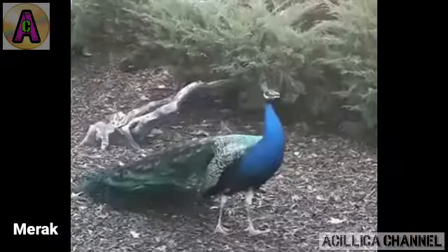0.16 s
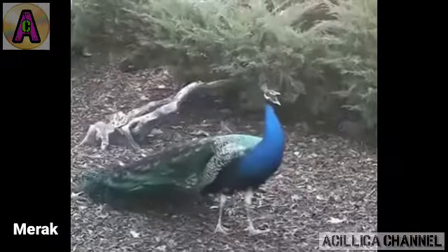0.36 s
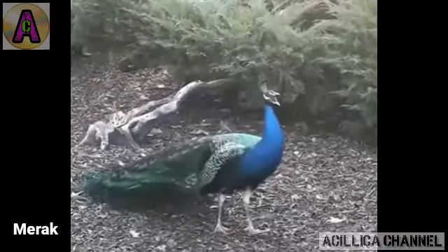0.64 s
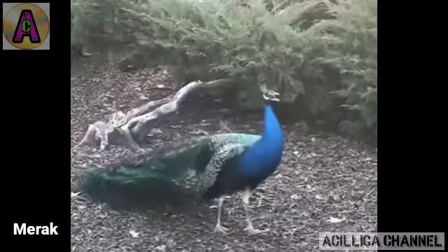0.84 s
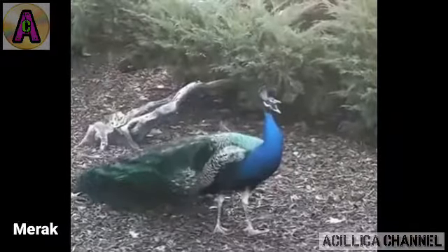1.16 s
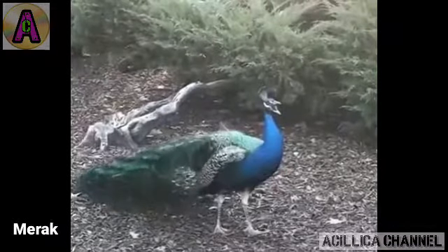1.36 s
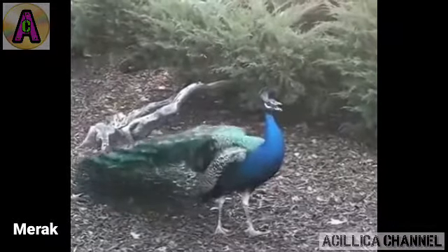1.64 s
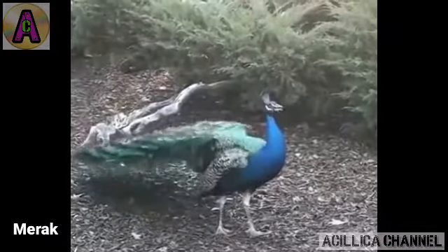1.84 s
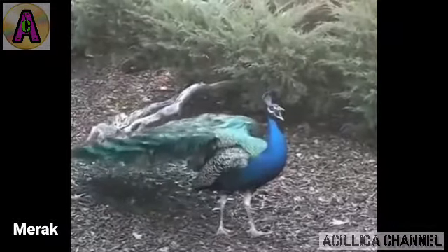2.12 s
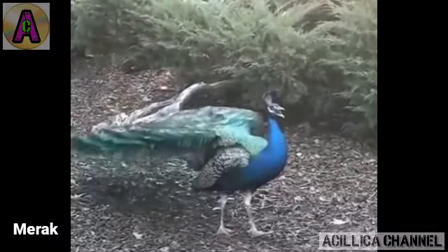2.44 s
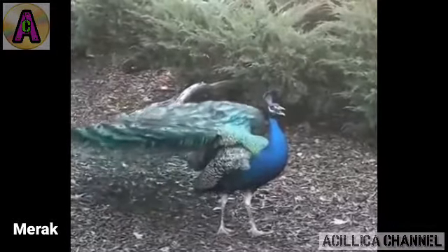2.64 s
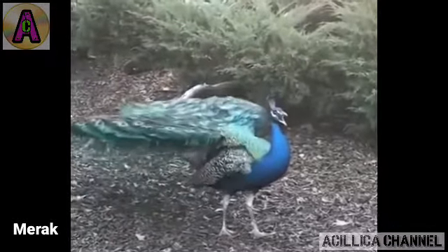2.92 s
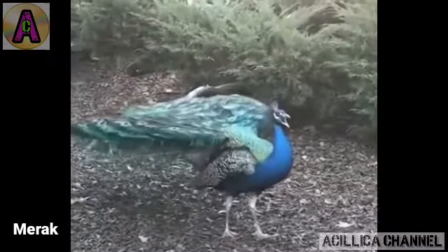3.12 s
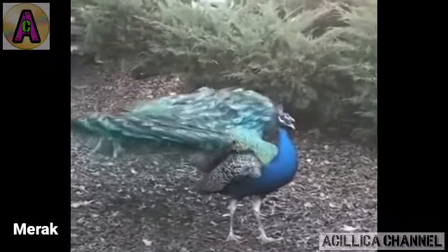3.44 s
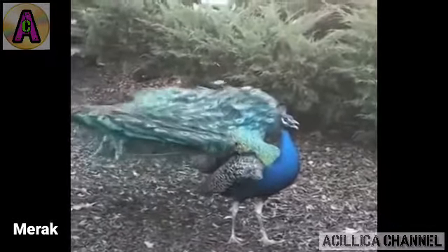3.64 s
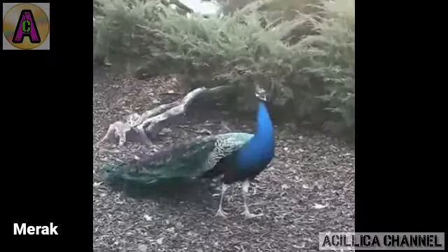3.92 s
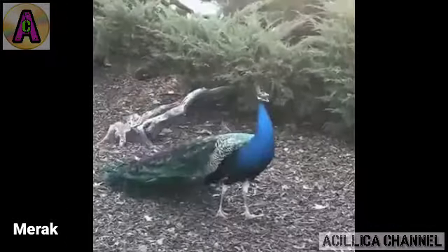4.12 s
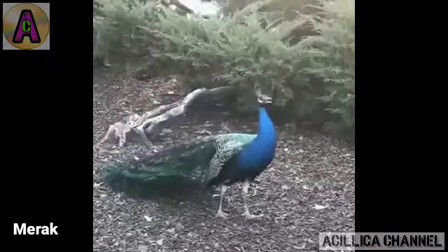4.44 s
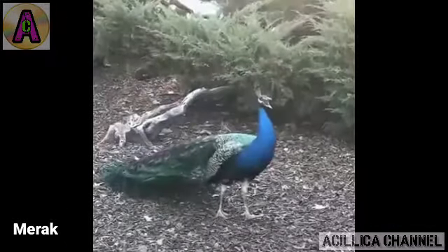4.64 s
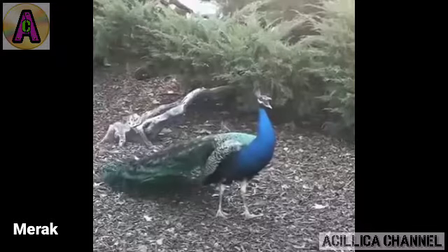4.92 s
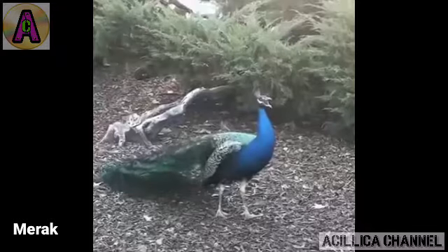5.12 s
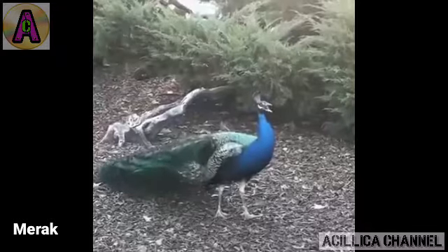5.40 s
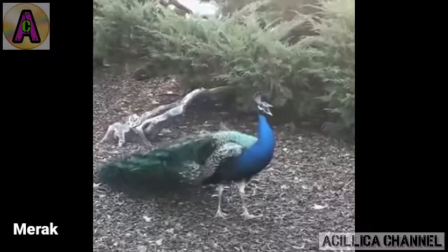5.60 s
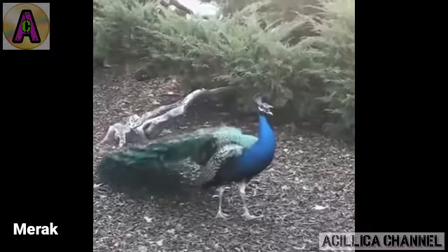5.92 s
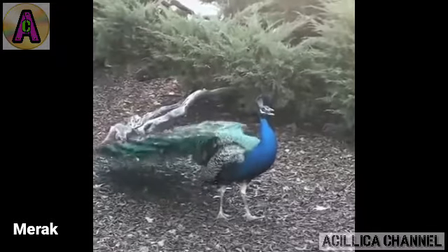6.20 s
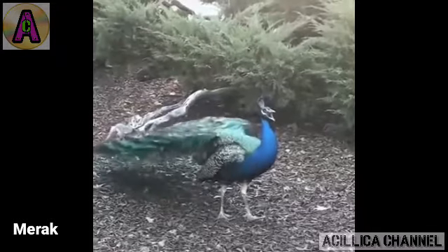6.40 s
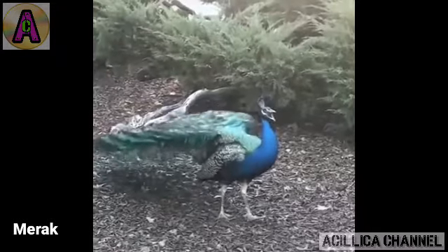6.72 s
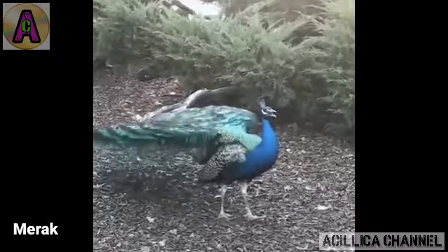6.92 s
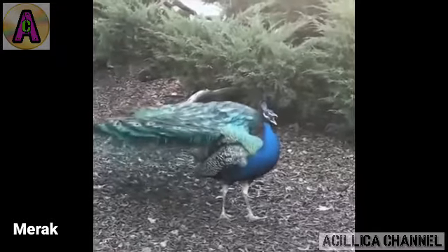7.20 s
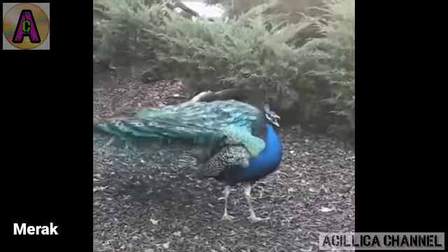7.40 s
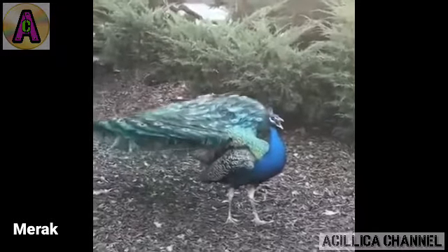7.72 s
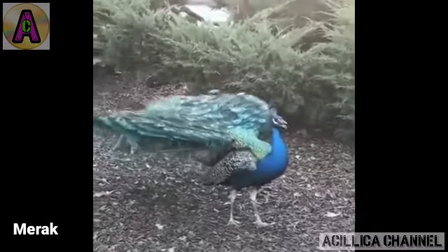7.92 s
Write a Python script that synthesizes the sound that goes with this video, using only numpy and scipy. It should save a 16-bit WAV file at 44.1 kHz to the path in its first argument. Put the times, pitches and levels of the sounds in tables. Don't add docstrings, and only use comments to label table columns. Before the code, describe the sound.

A breath of wind, then a peacock close to a small mono microphone screams at about 0.1, 0.9, 1.7 and 2.7 seconds. Each loud call lasts 0.55 to 0.65 seconds: a slightly rough start near 600 hertz, a quick climb to about 760, a clear brassy crest, then a sag and sudden collapse. Strong nasal overtones around 2 to 3.5 kilohertz give it a piercing meow. Shrubs blur it, and dull wall echoes and a faint tree haze follow. Wind swells and a tiny bird chirps near 3.5. At 3.7 comes a few hundredths of a second of silence, then the clipped tail of a call until 4.0. The same four calls repeat at 4.4, 5.3, 6.1 and 7.0, ending at 7.65. Low wind rumble, soft pops and quiet garden air continue between; a faint chirp at 7.9 and a gust close it. No treble above 8 kilohertz.

```python
import sys
import numpy as np
from scipy import signal
from scipy.io import wavfile
from scipy.ndimage import uniform_filter1d, minimum_filter1d

SR = 44100
rng = np.random.default_rng(int(sys.argv[2]) if len(sys.argv) > 2 else 0)


def undo_db(level):
    steps = np.asarray(level, float) / 20
    return 10 ** steps


def int16_out(signal):
    q = np.round(np.clip(np.atleast_2d(signal).T, -1, 1) * 32767)
    wavfile.write(sys.argv[1], SR, q.astype(np.int16))


N = 355181
JOIN = 3.7345
EDGE_HZ = 7640


def evened(x):
    return x / np.sqrt(np.mean(x ** 2) + 1e-20)


def read(points, hz):
    f, value = np.transpose(points)
    return np.interp(np.log(hz + 1), np.log(f + 1), value)


def add(mix, s, sound):
    part = mix[round(s * SR):][:len(sound)]
    part += sound[:len(part)]


def drift(shape, size):
    return evened(uniform_filter1d(uniform_filter1d(rng.standard_normal(shape), size), size))


# (pitch [Hz], brightness [dB], low weight [dB])
TENSION = [(604, -11.5, -0.5), (607, -15.5, -5.5), (673, -1, 2), (706.6, 6, 1.5), (741, 9, 0.5),
           (759, 9.5, 0.5), (757, 11.5, 2)]
POSTURE_AT = [.13, .42, .62, .88]
CLIMB_HZ, CLIMB_S = 171, .075
STEP_HZ, STEP_BEND = 27.98, 4.9
SAG_HZ, SAG_S, SAG_BEND = 127, 0.15, 1.2
DROP_HZ, DROP_S = 165, .011
TIRE_DB_PER_S, MIDDLE_S = -2, 5.62


def phrase(start, length, aim_hz, opened, posture, effort):
    t = np.linspace(0, length, num=200)
    left = length - t
    climb = CLIMB_HZ * np.exp(-t / CLIMB_S)
    step = STEP_HZ * np.exp(-(t / opened) ** STEP_BEND)
    sag = SAG_HZ * np.exp(-(left / SAG_S) ** SAG_BEND)
    drop = DROP_HZ * np.exp(-left / DROP_S)
    hz = aim_hz - climb - step - sag - drop
    pitch, *laws = np.transpose(TENSION)
    bright_db, low_db = (np.interp(hz, pitch, law) for law in laws)
    *shifts, posture_bright_db = posture
    shift = np.interp(t / length, POSTURE_AT, shifts)
    tired_db = TIRE_DB_PER_S * (start + t - MIDDLE_S)
    effort_db = np.interp(start + t, *np.transpose(effort))
    bright_db = bright_db + posture_bright_db + tired_db
    return np.transpose([start + t, effort_db, hz, shift, bright_db, low_db + .5 * tired_db])


# (centre [Hz], width [Hz], level [dB])
NECK = [(687, 244, -21), (1231, 223, -16), (1472, 61, -21.5), (1975, 230, -14.5), (2222, 98, -9),
        (2507, 29, -7), (2838.4, 113, -5.5), (3422, 143, -13), (3795, 110, -20), (3986, 190, -23.5),
        (4460, 294, -24.5), (4968, 110, -30.5), (5160, 340, -32), (5580, 200, -24), (6050, 230, -26.5),
        (6724, 446, -29), (7355, 260, -33.5)]


def neck_gain(hz):
    power = sum(undo_db(2 * db) / (1 + (2 * (hz - f) / w) ** 2) ** 1.5 for f, w, db in NECK)
    return np.sqrt(power)


# (pitch [Hz], roughness at the sixth harmonic [0-1])
RASP = [(540, .5), (640, .32), (700, .15), (735, .035), (760, .004)]


def harmonic_colour(k, effort_db, hz, shift, bright_db, low_db):
    colour = neck_gain(k * hz / shift) * (k * hz < EDGE_HZ + 300)
    upper_db = bright_db * np.clip((k - 4) / 3, 0, 1)
    colour *= undo_db(upper_db + low_db * (k < 3) + 1.2 * drift(colour.shape, size=20))
    colour *= undo_db(11 * read(RASP, hz) * (k > 4) * drift(colour.shape, size=9))
    colour *= undo_db(effort_db) / np.sqrt((colour ** 2).sum(0) / 2)
    return colour * undo_db(0.44 * drift(len(hz), size=30))


def fold_flutter(k, t, pitch_hz):
    rough = read(RASP, pitch_hz) * (k / 6) ** 1.8
    falling = (t > t[pitch_hz.argmax()]) * np.clip((pitch_hz - 620) / 60, 0, 1)
    rough *= .85 - .55 * falling
    skirt = drift(rough.shape, size=56) + 1j * drift(rough.shape, size=56)
    return (1 + rough * skirt) / np.sqrt(1 + 2 * rough ** 2)


# (frequency [Hz], lag [turns])
LAG = [(700, .33), (1500, .28), (2300, .62), (3000, .8), (3800, .92)]


def scream(rows):
    first, last = rows[0], rows[-1]
    catch = (first[0] - .003, first[1] - 12, *first[2:])
    die_away = (last[0] + .006, last[1] - 9, *last[2:])
    s, *columns = np.transpose([catch, *rows, die_away])
    columns[1] = np.maximum(columns[1], 575)
    t = np.arange(s[0], s[-1], 1 / SR)
    k = np.arange(1, 14)[:, None]
    slow = t[::32]
    controls = [uniform_filter1d(np.interp(slow, s, c), size=9, mode="nearest") for c in columns]
    colour = np.array([np.interp(t, slow, c) for c in harmonic_colour(k, *controls)])
    pitch_hz = np.interp(t, slow, uniform_filter1d(controls[1], size=5, mode="nearest"))
    flutter = fold_flutter(k, t, pitch_hz)
    spread = np.clip((pitch_hz - 620) / 120, .2, 1)
    lag = .5 + (read(LAG, k * pitch_hz) - .5) * spread
    turns = k * np.cumsum(pitch_hz) / SR - lag
    wave = (colour * flutter * np.exp(2j * np.pi * turns)).real.sum(0)
    edge = np.clip(np.minimum((t - s[0]) / 0.0029, (s[-1] - t) / 0.0028), 0, 1)
    return s[0], wave * edge


# (start [s], length [s], aimed pitch [Hz], beak fully open after [s])
CALLS = [
    (3.406, .571, 776.7, .1),
    (4.431, .601, 775.2, .089),
    (5.256, .538, 783.7, .115),
    (6.063, .593, 778.3, .147),
    (7.012, .641, 774.7, .157),
]
# (climb, crest, descent, end [resonance shift factor], brightness [dB])
POSTURE = [
    (1.1, 1.01, 1.015, .955, 0),
    (.985, 1.0, 1.003, .986, 0.029),
    (1.016, .995, 1.008, .995, 0),
    (1.015, 1.005, 1.0203, 0.996, 0.025),
    (1.0133, 1.008, 1.0225, 1.0147, 0),
]
# (time [s], effort [dB])
EFFORT = [
    [(3.76, -6), (3.848, -8.5), (3.962, -14), (3.975, -25.5)],
    [(4.432, -27.5), (4.44, -15), (4.454, -9), (4.486, -8.5), (4.658, -11.5), (4.936, -7.5), (5.016, -14),
     (5.031, -28)],
    [(5.258, -27), (5.27, -11), (5.352, -7), (5.386, -9), (5.538, -12.5), (5.578, -8.5), (5.722, -9),
     (5.78, -16), (5.794, -29)],
    [(6.064, -26), (6.072, -17.5), (6.09, -11), (6.164, -6.5), (6.346, -12), (6.412, -7), (6.562, -11),
     (6.636, -16), (6.655, -27.5)],
    [(7.013, -25), (7.021, -17), (7.043, -8.5), (7.109, -7.5), (7.289, -10.5), (7.389, -6.5),
     (7.611, -12.5), (7.635, -14.5), (7.652, -24)],
]


def peacock():
    out = np.zeros(N)
    for row, posture, effort in zip(CALLS, POSTURE, EFFORT):
        add(out, *scream(phrase(*row, posture, effort)))
    return out


def taps(t60_of, start):
    train = np.zeros(2 * SR)
    at = np.arange(round(start * SR), 2 * SR - 20, 20)
    train[at + rng.integers(0, 20, len(at))] = rng.choice([-1., 1.], len(at))
    hz, t, z = signal.stft(train, SR, nperseg=128)
    decay = undo_db(-60 * t / read(t60_of, hz)[:, None])
    tail = signal.istft(z * decay, SR, nperseg=128)[1]
    return tail / np.linalg.norm(tail)


# (delay [s], level [dB])
WALLS = [
    (.012, -24),
    (.182, -27),
    (.25, -39),
]
# (frequency [Hz], t60 [s])
TREES = [(500, 1.6), (1500, 3.7), (3000, 1.13), (4500, 1.35), (8000, 0.1)]
SHRUBS_DB, SHRUBS_T60 = -18, .065
TREES_DB = -32
FAR_DUCK_DB = -9


def garden(x, calling):
    shrubs = undo_db(SHRUBS_DB) * taps([(500, SHRUBS_T60), (8000, SHRUBS_T60)], 0.0023)[:SR // 4]
    echo = np.zeros(N)
    for delay, db in WALLS:
        add(echo, delay, undo_db(db) * x)
    dull = signal.butter(3, [1000, 3000], "band", fs=SR, output="sos")
    echo = signal.sosfilt(dull, echo)
    haze = signal.fftconvolve(x, undo_db(TREES_DB) * taps(TREES, 0.033))[:N]
    return undo_db(FAR_DUCK_DB * calling) * (echo + haze) + signal.fftconvolve(x, shrubs)[:N]


def noise(spectrum, patchy_db):
    before = round(JOIN * SR) - 4096
    frames, hz = (N - before) // 256 + 5, np.fft.rfftfreq(1024, 1 / SR)
    a, b, patches = rng.standard_normal((frames, 513, 3)).T
    patches = evened(uniform_filter1d(uniform_filter1d(patches, size=8, axis=0), size=8, axis=1))
    z = (a + 1j * b) * undo_db(read(spectrum, hz)[:, None] + patchy_db * patches)
    z[hz > spectrum[-1][0] + 200] = 0
    hiss = signal.istft(z, nperseg=1024, noverlap=768)[1]
    return np.r_[np.zeros(before), evened(hiss[:N - before])]


# (time [s], level [dB])
GUSTS = [(3.74, -45), (4.0, -56), (4.35, -46), (4.64, -51), (5.16, -44), (5.44, -56), (5.74, -59),
         (6.2, -44), (6.51, -53), (6.68, -48.5), (6.94, -49), (7.08, -55), (7.29, -56.5), (7.53, -55.5),
         (7.92, -39), (8.05, -41.5)]
# (frequency [Hz], density [dB per Hz])
WIND = [(15, -47.5), (28, -19), (40, -7), (62, 3), (100, -8.5), (150, -19.5), (220, -31)]
# (time [s], peak level [dB], frequency [Hz])
THUMPS = [(3.789, -27, 66.8), (3.894, -37, 72), (3.95, -33, 78), (4.258, -19, 81), (4.309, -33, 79.8),
          (4.388, -20, 75), (4.455, -33, 57.6), (4.67, -28, 75.4), (4.911, -26.5, 87), (4.957, -23, 73.6),
          (5.144, -25.5, 76), (5.29, -39, 69), (5.352, -31, 75), (5.522, -33.5, 61.6), (6.067, -32.5, 55),
          (6.126, -30.5, 99), (6.221, -26, 67), (6.327, -23.5, 59.3), (6.465, -28.5, 64), (6.518, -33, 80),
          (6.585, -27, 65), (6.741, -37, 48), (7.69, -28, 58.6), (7.781, -28.5, 56), (7.921, -30, 52.7),
          (7.989, -21.5, 62.5)]


def wind():
    s, gust_db = np.transpose(GUSTS)
    level_db = np.interp(np.arange(N) / SR, s, gust_db) + 2.9 * drift(N, size=700) + 2.0
    out = undo_db(level_db) * noise(WIND, 3.1)
    for s, db, hz in THUMPS:
        turns = np.arange(-1.2 * SR / hz, 1.2 * SR / hz) / SR * hz
        pop = np.cos(2 * np.pi * turns) * np.exp(-(turns / 0.67) ** 2)
        add(out, s - 0.95 / hz, undo_db(db) * pop)
    return out


# (time [s], length [s], centre [Hz], width [Hz], level [dB])
CHIRPS = [
    (4.14, 0.057, 7160, 250, -57),
    (6.87, 0.13, 7100, 250, -62),
    (7.855, 0.059, 5630, 500, -47.5),
    (7.856, 0.068, 6750, 500, -53),
]


def birds():
    out = np.zeros(N)
    for s, length, hz, width, db in CHIRPS:
        t = np.arange(0, length, 1 / SR)
        fuzz = drift(len(t), size=int(SR / width / 2)) * np.sin(2 * np.pi * hz * t)
        add(out, s, undo_db(db) * evened(fuzz) * np.hanning(len(t)))
    return out


# (frequency [Hz], density [dB per Hz])
AIR = [(40, -7), (120, 7), (250, -1.5), (500, -10.5), (1000, -8), (2000, -7), (3500, -15.5), (5000, -28),
       (7500, -24)]
AIR_DB, DUCK_DB = -47, -4.5


def garden_air(calling):
    return undo_db(AIR_DB + DUCK_DB * calling) * noise(AIR, 1.2)


def scene():
    bird = peacock()
    calling = np.clip(uniform_filter1d(abs(bird), size=3000) / .1, 0, 1)
    mono = bird + garden(bird, calling) + wind() + garden_air(calling) + birds()
    return np.array([mono, mono])


MASK_DB, MASK_BINS = -45.5, 19


def masked(x):
    hz, _, z = signal.stft(x, SR, nperseg=1024, noverlap=768)
    level = uniform_filter1d(abs(z), size=3, axis=0)
    peak = -minimum_filter1d(-level, size=MASK_BINS, axis=0)
    kept = (level > undo_db(MASK_DB) * peak) | (hz < 560)[:, None]
    z *= np.where(kept, 1, .12)
    valley = minimum_filter1d(uniform_filter1d(abs(z), size=5, axis=0), size=MASK_BINS, axis=0)
    noisy = (valley > undo_db(-17) * peak) & (hz > 4000)[:, None]
    side = undo_db(2) * valley * noisy * np.exp(2j * np.pi * rng.random(z.shape))
    both = np.array([z + side, z - side])
    return signal.istft(both, SR, nperseg=1024, noverlap=768)[1][:, :len(x)]


def top_cut(x):
    return signal.sosfilt(signal.butter(12, 8180, fs=SR, output="sos"), x)


LOOP = 191488


def record(dry):
    join, early = round(JOIN * SR), 2048
    overloaded = np.tanh(dry[0, join - early:] / 1.18) * 1.18
    passage = masked(overloaded)
    band_limit = signal.firwin(801, EDGE_HZ, window=("kaiser", 9), fs=SR)
    passage = signal.oaconvolve(passage, band_limit[None], "same")
    high = signal.butter(2, 3200, "high", fs=SR, output="sos")
    treble = signal.sosfiltfilt(high, passage[:, :2 * early])
    passage[:, early:2 * early] -= np.linspace(.8, 0, early) * treble[:, early:]
    out = np.zeros((2, N))
    out[:, join:] = passage[:, early:]
    out[:, join:join + 900] *= np.linspace(.55, 1, 900)
    out[:, :N - LOOP] = out[:, LOOP:]
    return top_cut(np.clip(out, -1, 1))


dry = scene()
out = record(dry)
int16_out(out)
```